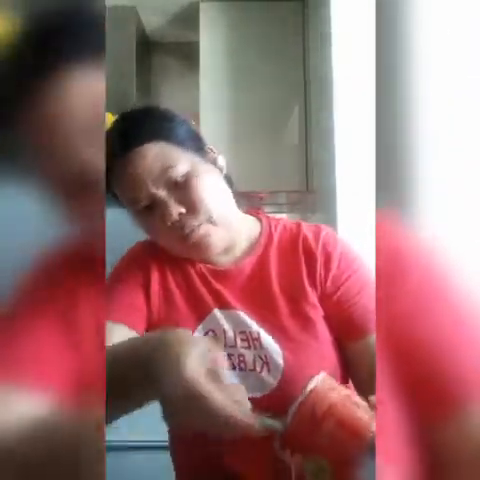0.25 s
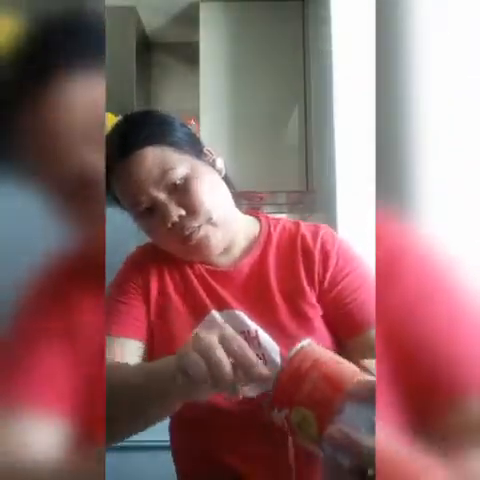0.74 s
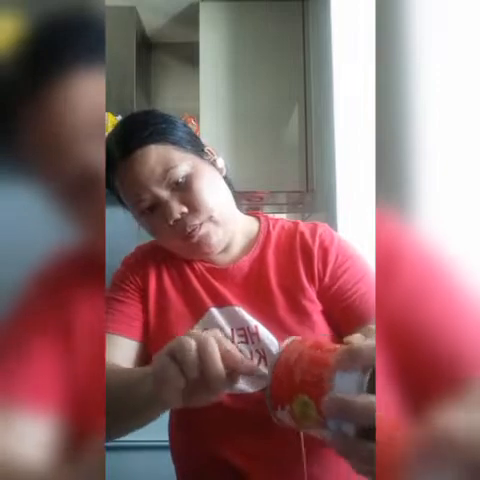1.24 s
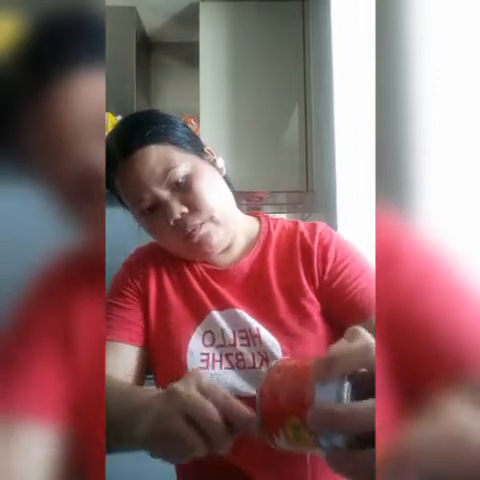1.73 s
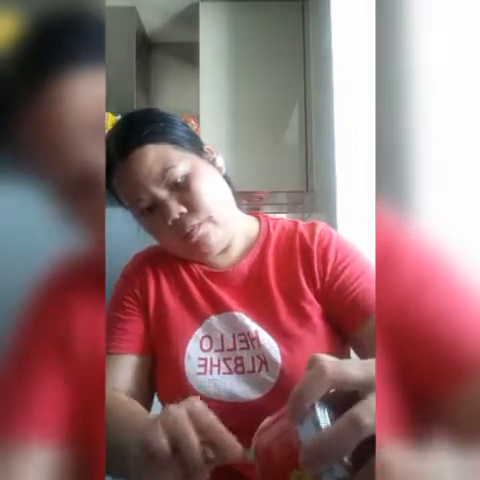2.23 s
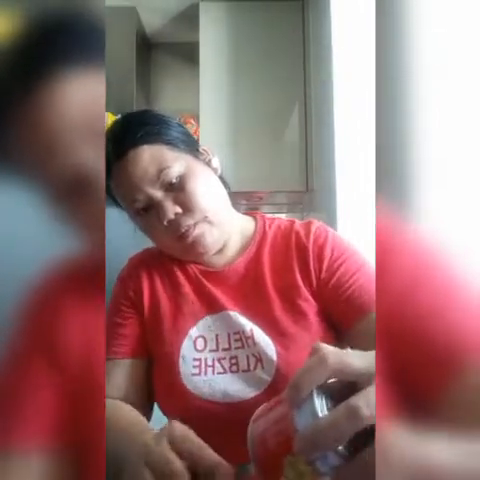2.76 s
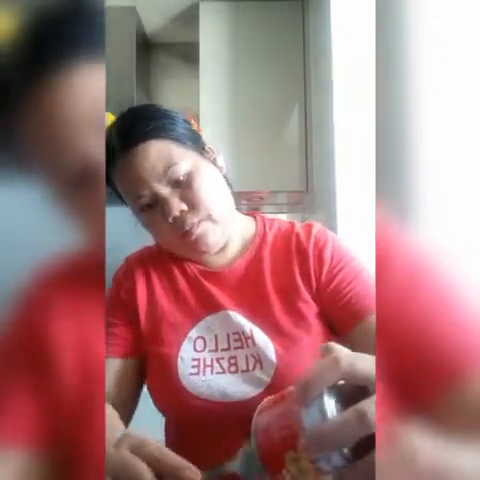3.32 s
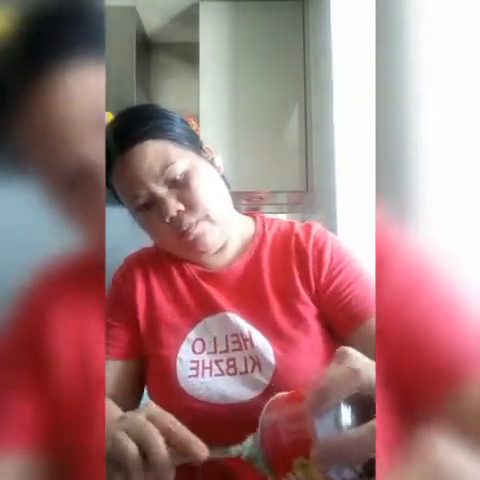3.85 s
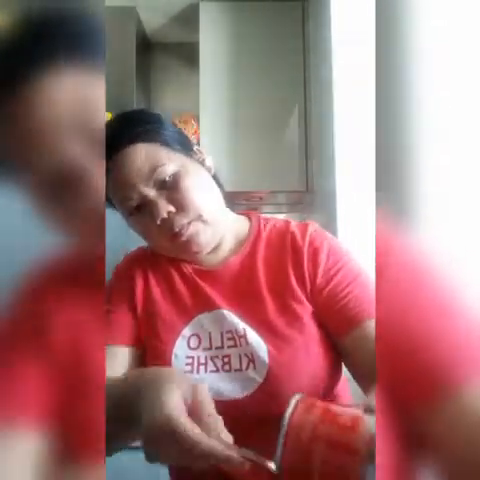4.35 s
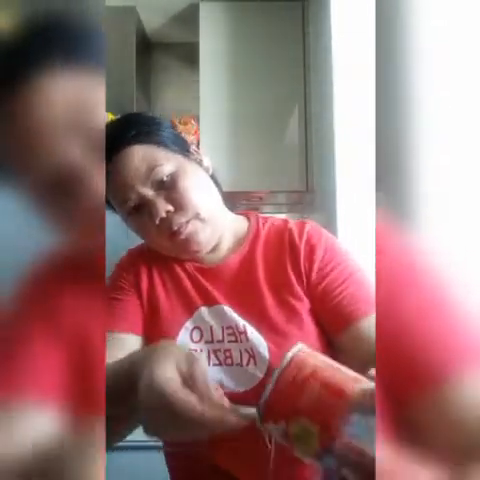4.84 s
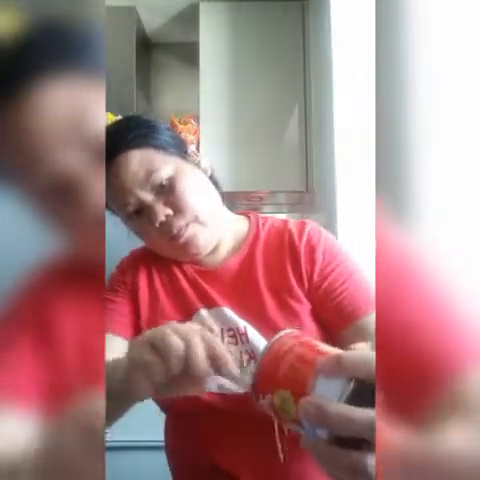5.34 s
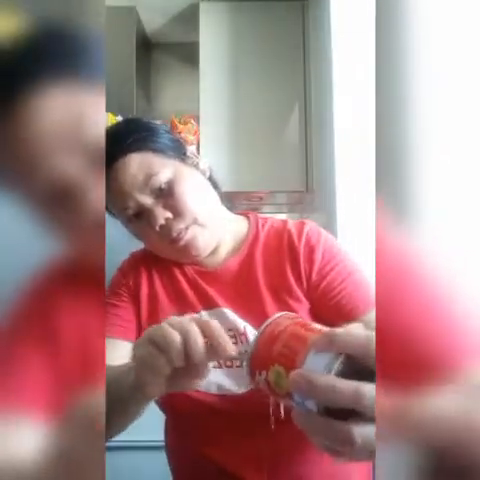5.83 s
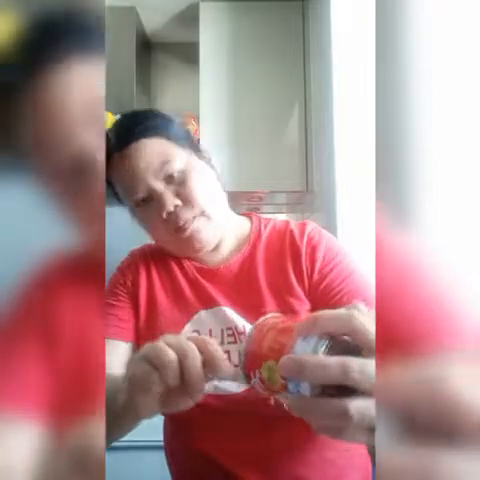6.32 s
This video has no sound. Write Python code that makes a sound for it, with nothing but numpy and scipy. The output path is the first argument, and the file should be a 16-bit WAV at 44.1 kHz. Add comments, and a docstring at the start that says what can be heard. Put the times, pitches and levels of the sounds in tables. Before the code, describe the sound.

A hand-held tool bites at a can's rim: bright metallic clicks, tinny hollow knocks and short raspy strokes, some juddering. Single bites spaced apart in the middle give way to rapid rattling clusters, then a pause and a last scrape with light ticks. Close, dry sound in a small kitchen with soft hiss and uneven low rumble.

```python
"""In a kitchen, a small steel opener knocks and scrapes round the rim of a tin can, close to a phone.
Knocks are sums of decaying wall modes with a noise crack; scrapes are stick-slip jolts that hiss and
drive the same modes as resonators; scuffs of the hand are short swells of low noise.
A short diffuse tail is the room; shaped noise gives air hiss, with a faint steady colour near 1270 Hz,
and a low appliance rumble."""
import sys
import numpy as np
from scipy import signal
from scipy.fft import rfft, irfft, next_fast_len
from scipy.io import wavfile
from scipy.ndimage import uniform_filter1d

SR = 44100
rng = np.random.default_rng(int(sys.argv[2]) if len(sys.argv) > 2 else 0)


def waveform_to_disk(signal):
    """Save audio, clipped to [-1, 1], as 16-bit WAV at the path in sys.argv[1]."""
    frames = np.transpose(np.atleast_2d(signal))
    scaled = np.clip(frames, -1, 1) * 32767
    samples = np.round(scaled).astype(np.int16)
    wavfile.write(sys.argv[1], SR, samples)


N = 290178

# Air noise of the kitchen. Each row: frequency in Hz, relative density in dB per Hz.
AIR_SPECTRUM = [(30, -21.5), (66, -5), (82, -1), (128, 3.5), (170, -9.5), (260, -17), (400, -30),
                (500, -19.5), (680, -36.5), (1270, -10.5), (1750, -39), (2900, -34), (4500, -58),
                (16000, -75.5)]
# Chance unevenness of the low noise. Each row: time in seconds, mean level in dB before a random wander.
RUMBLE_LEVELS = [(0.0, -50.5), (0.22, -37.5), (0.27, -52.5), (0.88, -42), (1.06, -53.5), (1.76, -44.5),
                 (1.85, -51), (2.0, -37), (2.09, -46.5), (3.33, -52), (3.39, -42.5), (3.65, -53),
                 (6.38, -48), (6.58, -67)]
# Scraping strokes. Each row: full pressure from and to in seconds, relative rasp of the edge in dB,
# relative drone of the can's body in dB, swell in dB per s.
SCRAPE_STROKES = [(.04, .06, -80, -36, 302), (0.448, 0.467, -51, -37, 291), (0.603, 0.716, -54.5, -36, 298),
                  (.8, 0.872, -50, -43, 300), (0.929, 1.034, -53, -45.5, 601),
                  (1.197, 1.26, -40, -33, 308.5), (1.42, 1.49, -45, -44, 301.5),
                  (1.55, 1.752, -46, -43, 501), (1.756, 1.839, -40, -33.5, 900),
                  (2.009, 2.072, -42.5, -56, 301), (2.204, 2.267, -41, -39, 246.5),
                  (2.627, 2.662, -37.5, -35, 205.5), (2.869, 2.928, -44.5, -41, 300),
                  (3.114, 3.194, -40.5, -38.5, 137.5), (3.4, 3.56, -68, -61, 300),
                  (3.629, 3.639, -42, -62, 302), (3.703, 3.755, -47.5, -56, 300),
                  (3.917, 4.045, -48.5, -41, 303), (4.203, 4.484, -54, -45, 401),
                  (4.515, 4.64, -46, -37.5, 409), (4.851, 4.866, -59, -37, 302),
                  (5.016, 5.102, -44, -36.5, 500), (5.367, 5.453, -46, -34, 500),
                  (5.597, 5.69, -48.5, -42, 304.5), (5.81, 5.854, -55.5, -40, 600),
                  (5.958, 6.057, -45, -35, 500), (6.266, 6.443, -43, -37, 291),
                  (6.48, 6.6, -45.5, -31.5, 304)]
# Spells of near-steady judder. Each row: start and end in seconds, jolts per s,
# jolt over the steady push in dB, before its random size and the evening out of loudness.
JUDDER_SPELLS = [(1.18, 1.251, 96, 5), (2.198, 2.262, 100, 8), (2.611, 2.69, 80, 3), (3.098, 3.179, 74, 10)]
# Hiss of edge on sheet. Each row: frequency in Hz, relative density in dB per Hz.
RASP_SPECTRUM = [(200, -49.5), (335, -71), (700, -15), (1270, -0.5), (1800, -18.5), (3450, -1), (4300, -9),
                 (7000, -15.5), (10000, -15), (13000, -26), (15200, -18), (16500, -19.5)]
# Modes of the can. Each row: frequency in Hz, relative level in dB, time of free ring to -60 dB in seconds.
CAN_MODES = [(342, 5.5, 0.38), (488, -3.5, 1), (543.8, 10, 0.27), (614, -3.5, 0.3), (826, 8, 0.16),
             (905, 3, 0.14), (940, 4.5, 0.7), (1053, 2, 0.23), (1246, 4.5, 0.081), (1271.6, 10, 0.16),
             (1257, -23.5, 0.065), (1429, 8, 0.64), (1656, 2.5, 0.22), (1723, 1.5, 0.17),
             (1938, 0.5, 0.085), (2057, 3.5, 0.43), (2170, 3.5, 0.17), (2391, 12.5, 0.03), (2830, -6, 0.15),
             (3017, 5.5, 0.33), (2880, -4.5, 0.19), (3578, -14.5, 0.78), (3571, 9.5, 0.15), (3865, 5, 0.1),
             (3850, -25, 0.24), (5096, 0.5, 0.12), (5646, 8, 0.0043), (6584, 2.5, 0.075),
             (7223, 2.5, 0.017)]
# Blows. Each row: start in seconds, peak levels in dB of the lid-end, wall and rim notes, loudest note
# in Hz of the lid end, wall and rim, damped ring to -60 dB at 1200 Hz in seconds, contact time constant
# in seconds (long where the tool skids as it lands).
BLOWS = [(0.156, -21.5, -17, -23, 900, 1279, 2450.0, 0.14, 0.00075),
         (0.41, -39, -37, -55, 965, 1286, 2440.0, 0.065, 0.0028),
         (0.581, -27.5, -32, -19.5, 513, 1010, 3770.0, 0.071, 0.00048),
         (0.623, -27, -19, -46, 930, 1116, 2890.0, 0.031, 0.00023),
         (0.71, -39, -32, -36, 1002, 1910, 3490.0, 0.042, 0.0061),
         (0.729, -26.5, -24.5, -32.5, 827, 1330, 3480.0, 0.097, 0.00039),
         (0.781, -26, -24.5, -30.5, 905, 1946, 4040.0, 0.089, 0.00023),
         (1.355, -26.5, -21.5, -19.5, 880, 1265, 3320.0, 0.061, 0.00023),
         (1.387, -26, -19, -13, 765, 1296, 3520.0, 0.055, 0.00071),
         (1.541, -39, -39, -36, 753, 1260, 3070.0, 0.16, 0.00079),
         (1.622, -41, -32, -33.5, 775, 1240, 3490.0, 0.031, 0.00066),
         (1.757, -31, -35, -17, 746, 1306, 3540.0, 0.11, 0.0084),
         (1.942, -19, -17.5, -15, 766, 1226, 3560.0, 0.074, 0.00024),
         (2.069, -28.5, -30.5, -23, 810, 1244, 3010.0, 0.036, 0.00045),
         (2.198, -36, -32.5, -42, 520, 1207, 2890.0, 0.051, 0.0036),
         (2.411, -22, -20, -10.5, 796, 1793, 3530.0, 0.04, 0.00074),
         (2.816, -24, -17, -9.5, 815, 1264, 2930.0, 0.044, 0.00046),
         (2.913, -41, -37.5, -29.5, 860, 1196, 3740.0, 0.12, 0.0012),
         (3.098, -44, -40.5, -29.5, 505, 1290, 3010.0, 0.065, 0.012),
         (3.344, -26, -26.5, -27, 838, 1200, 3490.0, 0.074, 0.00095),
         (3.574, -34, -16, -16, 816, 1235, 3500.0, 0.049, 0.00071),
         (3.731, -53, -26.5, -19.5, 921, 1284, 3490.0, 0.046, 0.00075),
         (3.827, -28, -17, -34.5, 635, 1682, 2770.0, 0.056, 0.0013),
         (3.877, -43, -56, -44, 603, 1570, 2850.0, 0.086, 0.00033),
         (4.003, -27.5, -25.5, -30.5, 985, 1002, 2810.0, 0.084, 0.0037),
         (4.019, -24, -28, -34, 924, 1025, 3100.0, 0.13, 0.00044),
         (4.068, -27.5, -35, -41, 897, 1410, 3100.0, 0.052, 0.0018),
         (4.141, -37, -34.5, -38.5, 918, 1249, 2410.0, 0.023, 0.0014),
         (4.509, -48, -34.5, -35.5, 920, 1611, 3900.0, 0.15, 0.014),
         (4.634, -23.5, -29, -34, 923, 1977, 2830.0, 0.11, 0.00035),
         (4.684, -23, -34.5, -33.5, 917, 1270, 3500.0, 0.12, 0.00039),
         (4.829, -44, -44, -31.5, 820, 1260, 3550.0, 0.031, 0.0006),
         (4.892, -28.5, -16, -35, 646, 1160, 2720.0, 0.072, 0.00099),
         (5.045, -42, -27.5, -29.5, 1008, 1287, 3990.0, 0.12, 0.0058),
         (5.072, -27.5, -25.5, -47.5, 873, 1237, 3920.0, 0.045, 0.0006),
         (5.106, -27, -16.5, -26, 470, 1251, 2430.0, 0.083, 0.0012),
         (5.134, -30, -30, -35.5, 476, 1285, 3780.0, 0.12, 0.0043),
         (5.285, -16, -12, -29.5, 902, 1055, 3700.0, 0.043, 0.00033),
         (5.397, -31, -21.5, -30, 535, 1260, 2710.0, 0.095, 0.007),
         (5.408, -21.5, -16, -18.5, 542, 1965, 2700.0, 0.053, 0.0027),
         (5.426, -17.5, -17, -23, 546, 1285, 3350.0, 0.053, 0.0011),
         (5.556, -31, -21.5, -14.5, 974, 1236, 3350.0, 0.047, 0.00072),
         (5.602, -20, -17.5, -31.5, 764, 1050, 3380.0, 0.034, 0.0018),
         (5.657, -31, -22, -26.5, 614, 1710, 2710.0, 0.084, 0.0044),
         (5.667, -23.5, -20, -19, 561, 2017, 3900.0, 0.11, 0.0029),
         (5.695, -22, -29, -33, 569, 1220, 2430.0, 0.074, 0.0079),
         (5.795, -41, -40, -26.5, 544, 1247, 3120.0, 0.11, 0.00033),
         (5.872, -27, -15.5, -30.5, 640, 1300, 2470.0, 0.091, 0.0017),
         (5.961, -36, -32, -32, 566, 2110, 2510.0, 0.058, 0.0051),
         (5.973, -25, -17, -22, 568, 2037, 2630.0, 0.14, 0.00083),
         (6.034, -22.5, -14.5, -18.5, 534, 2000, 3500.0, 0.051, 0.0018),
         (6.432, -35.5, -33, -29, 596, 1410, 3510.0, 0.097, 0.00044),
         (6.473, -26.5, -30, -29.5, 549, 1230, 3490.0, 0.06, 0.00046),
         (6.501, -28, -29.5, -24, 770, 1223, 3670.0, 0.11, 0.0006),
         (6.534, -32, -38, -30, 552, 1220, 3530.0, 0.088, 0.0016),
         (6.561, -41, -36, -29.5, 563, 1225, 3490.0, 0.05, 0.0027)]
# Edges in Hz of the bands of the lid end, lower wall, upper wall, rim and edge tick.
BAND_EDGES_HZ = [400, 1000, 1520, 2400, 4500, 16000]
# Upper wall note, which shifts as the grip moves round the can. Each row: time in seconds, frequency in Hz.
UPPER_WALL_NOTE = [(.15, 2150), (.7, 1913), (1.4, 1810), (3.35, 1790), (3.6, 1635), (3.9, 1770),
                   (4.0, 2070), (4.6, 1945), (5.6, 2010), (5.87, 1775), (6.0, 2010), (6.5, 1676)]
# Low scuffs of the hand shaking with the can. Each row: centre in seconds, half-width to 1/e in seconds,
# peak of the swell in dB.
HAND_SCUFFS = [(0.187, 0.056, -52), (0.602, 0.028, -45), (0.767, 0.072, -46.5), (1.246, 0.051, -41.5),
               (1.79, 0.11, -58), (1.97, 0.047, -54), (2.08, 0.023, -49), (2.235, 0.086, -59),
               (2.64, 0.043, -50), (3.165, 0.025, -48.5), (5.118, 0.019, -44.5), (5.42, .03, -48),
               (5.68, .03, -55), (6.065, 0.035, -47.5), (6.505, 0.037, -46)]

AIR_DB = -46.5  # whole air noise, before the rumble replaces its bass
REST_RASP_DB, REST_BODY_DB = -66, -55.5  # the tool resting on the can, on the scale of the strokes
LIFT_DB_PER_S = 334  # how fast a stroke dies as the tool lifts
SLIDE_RASP_DB, SLIDE_BODY_DB = -21, -13  # slide after a blow, relative to its rim and wall peaks
JOLT_S = .0025  # time constant of one jolt
GRIP_DB = 5  # rubbing favours the lid-end note that the last blow sounded, for the grip is the same
OTHER_WALL_DB, TICK_DB = -4.5, -6  # wall half away from the note, under the wall; edge tick, under the rim
UPPER_SHARE = .55  # a dull blow's upper wall falls this share of the way from wall to rim level, if lower
FREE_DB = -16  # free ring under the damped ring, when rim and wall are equal
FREE_PER_DB = -0.13  # a brighter blow bites and leaves less free ring: dB per dB of rim over wall
ROOM_T60_S, ROOM_DB = 0.24, -12  # decay of the middle band; gain of the unit-energy tail
TOP_HZ = 15700


def undb(db):
    """Decibels are twenty times the logarithm of an amplitude ratio; this inverts them."""
    return 10 ** (np.asarray(db) / 20)


def level(x, db):
    """Root-mean-square amplitude sets the level."""
    return x * undb(db) / np.sqrt(np.mean(x ** 2))


def band(x, lo_hz, hi_hz):
    """A Butterworth band-pass is flat between its edges."""
    return signal.sosfilt(signal.butter(2, [lo_hz, hi_hz], "band", fs=SR, output="sos"), x)


def colour(x, table):
    """Spectral weighting: each frequency is scaled by a curve through (Hz, dB) points."""
    hz, db = np.transpose(table)
    size = next_fast_len(len(x), True)
    f = np.maximum(np.arange(size // 2 + 1) * SR / size, 1)
    gain = undb(np.interp(np.log(f), np.log(hz), db))
    return irfft(rfft(x, size) * gain, size)[:len(x)]


def walk(rate):
    """Smoothed random fluctuation: normal levels held 1 / rate s and slewed twice."""
    hold = int(SR / rate)
    steps = np.repeat(rng.standard_normal(N // hold + 1), hold)
    return np.sqrt(2) * uniform_filter1d(uniform_filter1d(steps, hold), hold)[:N]


def kitchen():
    """Broadband noise: air hiss over a low rumble of randomly uneven level."""
    air = level(colour(rng.standard_normal(N), AIR_SPECTRUM), AIR_DB)
    bass = band(air, 57, 220)
    s, db = np.transpose(RUMBLE_LEVELS)
    rumble_db = np.interp(np.arange(N) / SR, s, db) + 1.5 * walk(8.7)
    return air - bass + level(bass, 0) * undb(rumble_db)


def rubbing(strokes):
    """Powers add: every stroke swells, holds and lifts over the resting tool; gives rasp and drone in dB."""
    t = np.arange(0, N / SR + .002, .001)
    power = undb(2 * np.array([[REST_RASP_DB], [REST_BODY_DB]])) + 0 * t
    for start, end, rasp_db, body_db, swell in strokes:
        under_db = abs(swell) * np.maximum(start - t, 0) + LIFT_DB_PER_S * np.maximum(t - end, 0)
        stroke_db = np.array([[rasp_db], [body_db]]) - np.minimum(under_db, 200)
        power = power + undb(2 * stroke_db)
    return [np.interp(np.arange(N) / SR, t, row) for row in 10 * np.log10(power)]


def slides():
    """Residual sliding friction: each blow trails off in a short stroke that starts at once."""
    return [(s + .001, s + .001, rim_db + SLIDE_RASP_DB, wall_db + SLIDE_BODY_DB, 1e5)
            for s, _, wall_db, rim_db, *_ in BLOWS]


def judder(t):
    """Periodic stick-slip: gain of the edge's push, with sharp jolts of uneven size in each spell."""
    push = np.ones(N)
    size = undb(1.5 * walk(80))
    for start, end, rate, db in JUDDER_SPELLS:
        inside = (t > start) & (t < end)
        since_jolt_s = ((t - start) * rate % 1) / rate
        push = push + inside * undb(db) * size * np.exp(-since_jolt_s / JOLT_S)
    return push


def scrape():
    """Stick-slip friction: uneven tiny jolts of the edge hiss and keep the can's modes ringing."""
    rasp_db, body_db = rubbing(SCRAPE_STROKES + slides())
    t = np.arange(N) / SR
    slips = (rng.random(N) < 3000 / SR) * rng.standard_normal(N) * undb(2.0 * rng.exponential(size=N))
    catches = (rng.random(N) < 160 / SR) * undb(0.92 * rng.standard_normal(N))  # the edge snags on ridges
    pressure = np.clip((rasp_db + 62.5) / 25, 0, 1)  # light rubbing is smooth and dull
    snags = signal.lfilter([1], [1, -np.exp(-1 / (0.011 * SR))], catches)  # each dies away over 11 ms
    bursts = 1.2 + 0.68 * pressure * snags
    grains = (0.59 + pressure) * level(slips, 0) + 1.88 * rng.standard_normal(N)
    grit = level(grains * bursts * undb(2.35 * walk(60)), 0)
    jolts = judder(t)
    grit = grit * jolts / uniform_filter1d(jolts, SR // 40)
    edge = grit * undb(rasp_db)
    body = grit * undb(body_db - 11.5)

    hiss = colour(edge, RASP_SPECTRUM)
    # the colour shifts: each stretch of the rasp flickers alone
    stretches_hz = ((2500, 4200), (4600, 6200), (6800, 9500), (10500, 13500))
    parts = [band(hiss, lo, hi) for lo, hi in stretches_hz]
    hiss = hiss + sum(part * (undb(2.47 * walk(25)) - 1) for part in parts)
    dull = band(hiss, 200, 5100)
    out = undb(8.5) * (dull + (hiss - dull) * undb(-6.0 * (1 - pressure)))

    steps = np.arange(0, t[-1] + .1, .06)
    blows = np.array(BLOWS)
    last_blow = np.maximum(np.searchsorted(blows[:, 0], steps) - 1, 0)
    lid_hz = blows[last_blow, 4]
    for hz, db, t60 in CAN_MODES:
        pole = np.exp(-np.log(1000) / (.3 * t60 * SR))  # the pressing tool damps the wall
        spot_db = 4.5 * rng.standard_normal(len(steps))  # the contact moves over nodes
        grip_db = GRIP_DB * np.exp(-(np.log(lid_hz / hz) / 0.028) ** 2)
        spot = np.interp(t, steps, undb(spot_db + grip_db))
        drive = spot * (body if hz < BAND_EDGES_HZ[3] else undb(-2.5) * edge)
        turn = 2 * np.pi * hz / SR  # phase advance per sample
        ringing = signal.lfilter([1], [1, -2 * pole * np.cos(turn), pole * pole], drive)
        out = out + undb(db - 16.5) * np.sqrt(1 - pole) * np.sin(turn) * ringing
    return out


def knock(peaks_db, notes_hz, ring_s, contact_s, free_db, chance, noise):
    """Modal excitation: modes build up over the contact and decay, and the loose sheet rattles as noise."""
    t = np.arange(noise.shape[1]) / SR
    hz, db, t60 = np.transpose(CAN_MODES)
    hz = hz * (1 + 0.013 * chance[0])  # the grip bends the wall and shifts each mode a little
    db = db + 3.0 * chance[1]
    for note_hz in notes_hz:  # the mode nearest the struck spot's note leads
        k = np.argmin(np.abs(hz - note_hz))
        hz[k], db[k] = note_hz, max(db[k], 7.0) + 14.5
    contact_s = max(contact_s, 1e-4)

    # tool and hand damp the wall, the high modes sooner; what is left rings freely
    held_s = max(ring_s, .01) * (hz[:, None] / 1200) ** -.4
    held = np.exp(-np.log(1000) * t / held_s)
    beat = np.cos(2 * np.pi * 14 * chance[2][:, None] * t)  # the dented wall splits each mode into a close pair
    free = undb(free_db) * beat * np.exp(-np.log(1000) * t / t60[:, None])
    unevenness = 2.97 * min(contact_s / 0.001, 1) * level(band(noise[1], 25, 650), 0)
    grind = 3.5 + unevenness * np.exp(-t / (3 * contact_s))  # uneven push while in touch
    rise = (1 - np.exp(-t / contact_s)) * grind
    rings = undb(db)[:, None] * (held + free) * rise * np.sin(2 * np.pi * hz[:, None] * t)

    crack = noise[0] * rise * (np.exp(-t / (0.0059 + contact_s)) + 0.17 * np.exp(-t / 0.034))
    crack = colour(crack, RASP_SPECTRUM)
    cracks_db = (-2, -4.5, -37.5, 4.5, 3)  # crack in each band, against rings at 0 dB
    out = 0
    for lo, hi, peak_db, crack_db in zip(BAND_EDGES_HZ, BAND_EDGES_HZ[1:], peaks_db, cracks_db):
        band_rings = rings[(hz >= lo) & (hz < hi)].sum(axis=0)
        part = band(level(band_rings, 0) + level(crack, crack_db), lo, hi)
        out = out + part * undb(peak_db) / np.abs(part).max()
    return out


def knocks():
    """Superposition: the responses to all blows of the tool on the can add up."""
    size = SR // 7
    out = np.zeros(N + size)
    for s, lid_db, wall_db, rim_db, lid_hz, wall_hz, rim_hz, ring_s, contact_s in BLOWS:
        walls_db = [wall_db + OTHER_WALL_DB, wall_db]
        notes_hz = [lid_hz, wall_hz, rim_hz]
        if wall_hz < BAND_EDGES_HZ[2]:  # the lower wall leads
            upper_db = wall_db + min(OTHER_WALL_DB, UPPER_SHARE * (rim_db - wall_db))
            walls_db = [wall_db, upper_db]
            notes_hz = notes_hz + [np.interp(s, *np.transpose(UPPER_WALL_NOTE))]
        peaks_db = [lid_db, *walls_db, rim_db, rim_db + TICK_DB]
        free_db = FREE_DB + FREE_PER_DB * (rim_db - wall_db)
        chance = rng.standard_normal((3, len(CAN_MODES)))
        noise = rng.standard_normal((2, size))
        blow = knock(peaks_db, notes_hz, ring_s, contact_s, free_db, chance, noise)
        out[int(s * SR):int(s * SR) + size] += blow
    return out[:N]


def scuffs():
    """Band-limited friction noise: the hand shakes and rubs on the hollow can in short dull swells."""
    t = np.arange(N) / SR
    swell = sum(undb(db) * np.exp(-((t - s) / length_s) ** 2) for s, length_s, db in HAND_SCUFFS)
    return swell * level(band(rng.standard_normal(N), 222, 704), 0)


def room(x):
    """Diffuse reverberation: hard walls return a short noise tail whose middle band dies last."""
    t = np.arange(SR // 2) / SR
    noise = rng.standard_normal(len(t)) * (t > .004)
    middle = band(noise, 370, 6000)
    outer = noise - middle
    tail = middle * undb(-60 * t / ROOM_T60_S) + outer * undb(-60 * t / (0.78 * ROOM_T60_S))
    return signal.fftconvolve(x, tail / np.sqrt(np.sum(tail ** 2)))[:N] * undb(ROOM_DB)


def scene():
    """Linear superposition: the can, its reverberation and the kitchen's noise add."""
    can = knocks() + scrape() + scuffs()
    return (can + room(can) + kitchen())[None]


def record(dry):
    """Band limitation: the phone drops the deep bass and cuts the top."""
    dry = signal.sosfilt(signal.butter(2, 50, "high", fs=SR, output="sos"), dry)
    return signal.sosfilt(signal.ellip(8, .2, 60, TOP_HZ, fs=SR, output="sos"), dry)


dry = scene()
out = record(dry)
waveform_to_disk(out)
```